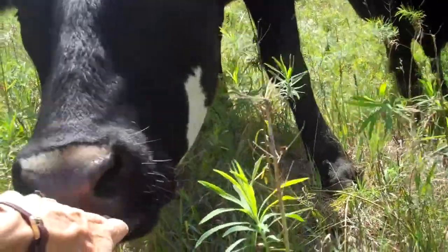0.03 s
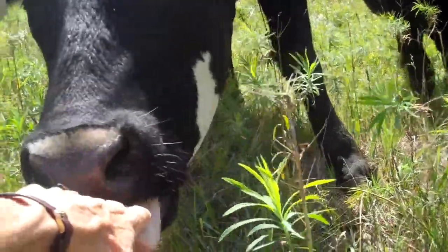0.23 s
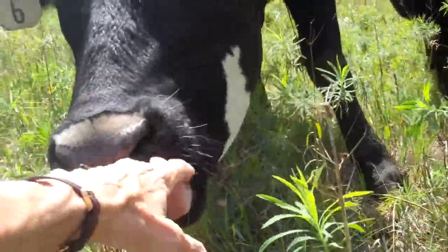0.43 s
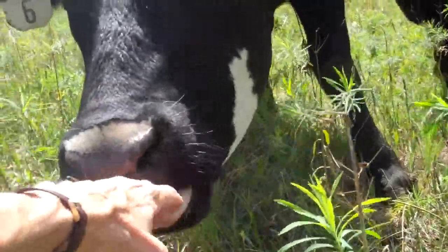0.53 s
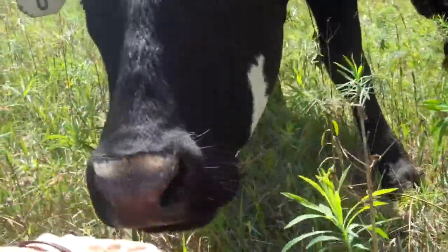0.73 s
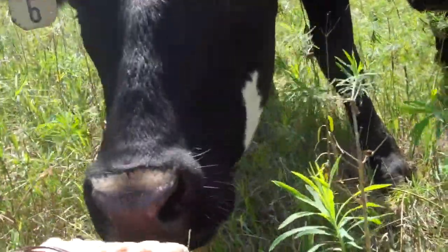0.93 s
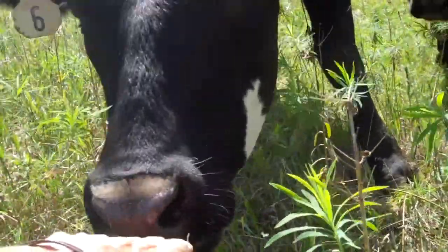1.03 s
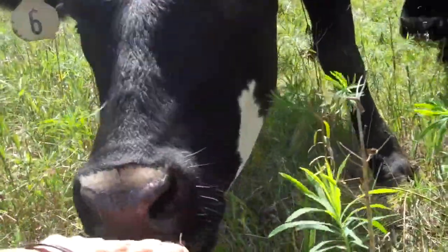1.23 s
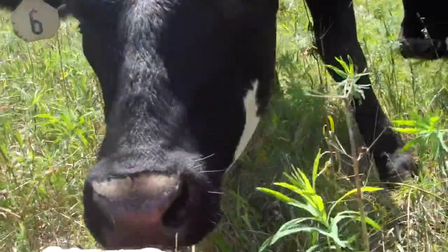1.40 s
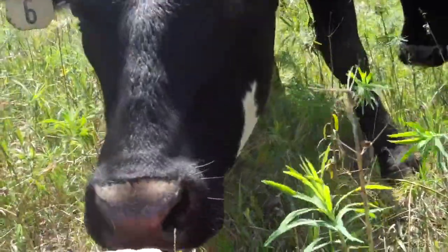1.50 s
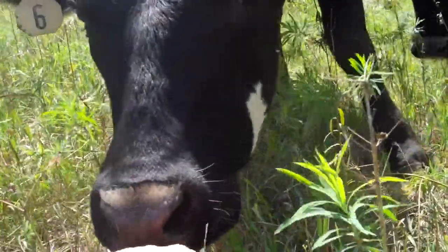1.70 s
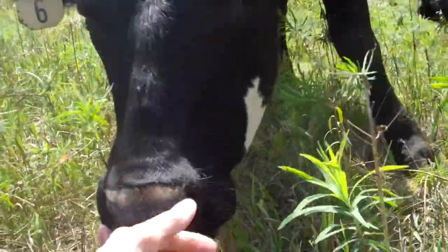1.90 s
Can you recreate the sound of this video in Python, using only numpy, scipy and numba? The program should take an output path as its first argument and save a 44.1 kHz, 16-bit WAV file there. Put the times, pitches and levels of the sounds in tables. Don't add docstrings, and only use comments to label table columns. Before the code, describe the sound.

One rising cow moo over grassy insect hiss, with close sniffs and a final wet lip smack

```python
import sys
import numpy as np
from scipy import signal
from scipy.io import wavfile
from scipy.ndimage import uniform_filter1d
from numba import njit

SR = 44100
rng = np.random.default_rng(int(sys.argv[2]) if len(sys.argv) > 2 else 0)


def volts_from_db(level):
    exponent = np.asarray(level, float) / 20
    return 10 ** exponent


def transcribe(signal):
    frames = np.atleast_2d(signal).T
    limited = np.clip(frames, -1, 1)
    pcm = np.round(limited * 32767).astype(np.int16)
    wavfile.write(sys.argv[1], SR, pcm)


N = 85995

# f/Hz, level/dB per Hz
FIELD_SPECTRUM = [(150, -15), (350, -21), (780, -22), (1200, -24.5), (3000, -24), (9500, -26.5),
                  (11000, -48.5), (14000, -72.5)]
FIELD_HISS_DB, FIELD_PAN_DB, ALIKE_UNDER_HZ = -45, -3, 1500
FIELD_SWELL_DB, FIELD_FLICKER_DB = .8, 1.5

# t/s, length/s, level/dB
GUSTS = [
    (.35, 0.04, -45.5),
    (.99, 0.089, -43),
    (1.105, 0.11, -51),
    (1.5, .08, -43.5),
    (1.684, 0.11, -38.5),
    (1.85, 0.17, -52),
]
WIND_HZ, WIND_BASE_DB = 110, -51

# t/s, length/s, level/dB, brightness f/Hz
SNIFFS = [
    (0.113, 0.023, -49, 4500),
    (0.346, 0.16, -42.5, 5600),
    (0.597, 0.08, -43, 7500),
    (0.903, 0.054, -46, 8100),
    (0.974, 0.13, -46.5, 8906),
    (1.603, 0.017, -40.5, 9180),
    (1.708, 0.21, -51.5, 786),
]
SNIFF_LOW_HZ, SNIFF_LOW_DB = 345, 5.5

# f/Hz, level/dB, t60/s
SMACK_MODES = [(2250, 1, 0.01), (2640, 9, 0.0069), (4000, -16.5, 0.027), (5360, -9, .008)]
SMACK_S, SMACK_DB = 1.928, -27.5

# t/s, pitch f/Hz, level/dB
CALL = [(0.0, 104.8, -39), (0.126, 110.7, -35.5), (0.242, 121.4, -26.5), (0.492, 131.2, -20.5),
        (0.67, 137.4, -19), (0.758, 138.6, -19.5), (0.866, 146, -18.5), (0.958, 156.9, -18),
        (1.082, 166.0, -14.5), (1.356, 175.9, -13.5), (1.48, 173.7, -14), (1.53, 163.4, -13.5),
        (1.562, 147.7, -18), (1.598, 127, -18.5), (1.626, 109.8, -38), (1.64, 106.5, -40)]
# t/s, posture/1 (0 parting, 1 ajar, 2 half open, 3 wide, 4 closing)
MOUTH = [
    (.24, 1),
    (.31, 1.05),
    (.43, 1.24),
    (.6, 1.87),
    (.8, 2),
    (1.03, 3),
    (1.3, 3.),
    (1.535, 3),
    (1.585, 3.95),
]
LIPS_PART_S, PART_TAKES_S = .166, 0.0013
# period scatter/1, size scatter/dB, breath level/dB
UNEVENNESS = [(.0012, .6, -22), (.001, .5, -23), (.0007, .4, -24), (.0005, .5, -25), (.005, 2., -13)]
PULSE_TOP_HZ, PULSE_TURN, TREBLE_LAG_MS_PER_KHZ = 8200, .7, .8
# f/Hz, width/Hz, level/dB
NOSE = [(130, 120, -2), (366.6, 65, 13), (615, 164, 1.5), (1230, 99, 3), (2150, 120, -19), (2586, 81, 3.5),
        (2900, 290, -6), (4320, 130, -8), (5400, 230, -36)]
# f/Hz parting, f/Hz half open, f/Hz wide, f/Hz closing, width/Hz
THROAT = [(200, 278, 270, 270, 278), (383, 394.6, 384.5, 385, 112), (680, 720, 595, 730, 310),
          (1140, 970, 957, 961, 193), (1470, 1450, 1409, 1360, 165), (1760, 1770, 1657, 1500, 265),
          (1914, 1929, 1930, 1980, 136), (2215, 2167, 2200, 2400, 204), (2620, 2655, 2450, 2100, 170),
          (3146, 3173, 2950, 3050, 181), (3710, 3715, 3378, 4100, 277), (4250, 4230, 3790, 4200, 227),
          (4670, 4670, 4470, 3900, 290), (5080, 5120, 5050, 5100, 230), (6100, 6100, 6100, 6600, 370),
          (6900, 6900, 6900, 6900, 360)]
# level/dB parting, ajar, half open, wide, closing
THROAT_STRENGTH = [(-15, -15.5, -11.5, -22.5, -11), (3.5, 3.5, 6, 1, 5), (-13.5, -21.5, -38, -18.5, -27),
                   (-17.5, -13, -16, -10, -13), (1, -4.5, -12, -7, -15), (-22.5, -30.5, -15.5, -7.5, -28.5),
                   (1.5, -0.5, -3, 2, 0), (-15, -16, -16, -12.5, -17), (-11, -6, -26.5, -19.5, -15),
                   (-19, -10, -24.5, -14.5, -23), (-23.5, -16, -16, -20.5, -32),
                   (-7.5, -23, -35, -17, -25.5), (-40, -29.5, -31, -30.5, -39),
                   (-38, -28.5, -38, -36.5, -42.5), (-32, -41, -42, -39.5, -48),
                   (-38, -39, -57.5, -36.5, -45)]
WANDER_DB, WANDER_RATE = 2., 8
# f/Hz, left minus right level/dB
LEAN = [(300, -3), (900, -2.5), (1900, -0.9), (3000, -6.5), (4500, -5)]

# delay/ms, level/dB
GROUND = [(.9, -17), (1.2, -15)]
FIELD_T60_S, SCATTER_DB = .3, -30
MIC_LOW_HZ, MIC_TOP_HZ = 39.3, 10350


def level(x, db):
    return x * volts_from_db(db) / np.sqrt(np.mean(x ** 2))


@njit
def svf(x, hz, width):
    y, b, l = np.empty(len(x)), 0., 0.
    for i in range(len(x)):
        g, k = np.tan(np.pi * hz[i] / SR), width / hz[i]
        v = (b + g * (x[i] - l)) / (1 + g * (g + k))
        b, l, y[i] = 2 * v - b, l + 2 * g * v, k * v
    return y


def band(x, hz, width):
    return svf(x, hz + np.zeros(N), float(width))


def walk(rate):
    hold = int(SR / rate)
    levels = rng.standard_normal(900)
    held = np.repeat(levels[:N // hold + 1], hold)
    return 1.3 * uniform_filter1d(uniform_filter1d(held, hold), hold)[:N]


def swell(t, at, length):
    return np.cos(np.pi * np.clip((t - at) / length, -.5, .5))


def pan(db):
    return volts_from_db(np.array([[db / 2], [-db / 2]]))


def field():
    hz_points, db_points = np.array(FIELD_SPECTRUM).T
    out, slow = 0, walk(4.5)
    for hz in 150 * 2 ** np.arange(0, 6.6, .5):
        mid, side = (band(rng.standard_normal(N), hz, hz / 2.6) for _ in range(2))
        db = np.interp(np.log(hz), np.log(hz_points), db_points)
        db = db + FIELD_SWELL_DB * slow + FIELD_FLICKER_DB * walk(6.07)
        unlike = min(hz / ALIKE_UNDER_HZ, 1)
        out = out + volts_from_db(db) * (mid + unlike * side * np.array([[1], [-1]]))
    return level(out, FIELD_HISS_DB) * pan(FIELD_PAN_DB)


def wind(t):
    force = volts_from_db(WIND_BASE_DB) + sum(volts_from_db(db) * swell(t, at, length) for at, length, db in GUSTS)
    low = signal.butter(2, WIND_HZ, fs=SR, output="sos")
    ports = []
    for _ in range(2):
        flutter = volts_from_db(2.8 * walk(34.9))
        ports.append(flutter * level(signal.sosfilt(low, rng.standard_normal(N)), 0))
    return force * pan(-1.8) * np.array(ports)


def sniffs(t):
    out = 0
    for at, length, db, hz in SNIFFS:
        shared, *own = rng.standard_normal((3, N))
        hiss = np.array([band(shared + 2.4 * air, hz, 0.43 * hz) for air in own])
        low = level(band(shared, SNIFF_LOW_HZ, 660), SNIFF_LOW_DB)
        out = out + volts_from_db(db) * swell(t, at, length) * (level(hiss, 0) * pan(-5.5) + low)
    return out


def smack(t):
    u = np.maximum(t - SMACK_S, 0)
    ring = sum(volts_from_db(db - 60 * u / t60) * np.sin(2 * np.pi * hz * u) for hz, db, t60 in SMACK_MODES)
    onset = np.minimum(u / 0.0023, 1) ** 2
    return volts_from_db(SMACK_DB + 11.5) * ring * onset * pan(-2.0)


def by_mouth(mouth, row):
    return np.interp(mouth, range(len(UNEVENNESS)), row)


def vocal_folds(t, mouth):
    jitter, shimmer_db, breath_db = (by_mouth(mouth, row) for row in np.array(UNEVENNESS).T)
    at, hz, _ = np.array(CALL).T
    pitch = uniform_filter1d(np.interp(t, at, hz), size=1200) * (1 + jitter * walk(70))
    phase = 2 * np.pi * np.cumsum(pitch) / SR
    lag = np.pi * TREBLE_LAG_MS_PER_KHZ * (pitch / 1000) ** 2
    pulses, partial = 0, np.exp(2j * np.pi * PULSE_TURN)
    step, trail = np.exp(1j * (phase - lag)), np.exp(-2j * lag)
    for k in np.arange(1, PULSE_TOP_HZ // 130):
        partial, step = partial * step, step * trail
        pulses = pulses + partial.real * np.clip((PULSE_TOP_HZ - k * pitch) / 1500, 0, 1)
    pulses = level(pulses, 0) * volts_from_db(shimmer_db * walk(60))
    breath = volts_from_db(breath_db) * (1 + np.cos(phase)) * rng.standard_normal(N)
    return pulses + breath


def nose_cavity(folds):
    rings = [(-1) ** k * volts_from_db(db) * band(folds, hz, width) for k, (hz, width, db) in enumerate(NOSE)]
    return sum(rings) * pan(-2.4)


def throat_cavity(folds, mouth):
    out = 0
    for k, (resonance, strength) in enumerate(zip(THROAT, THROAT_STRENGTH)):
        parting, half, wide, closing, width = resonance
        centre = by_mouth(mouth, [parting, (parting + half) / 2, half, wide, closing])
        wander = WANDER_DB * min(half / 3000, 1) * walk(WANDER_RATE)
        ring = band(band(folds, centre, width), centre, width)
        ring = ring * volts_from_db(by_mouth(mouth, strength) + wander)
        out = out + (-1) ** k * ring * pan(np.interp(half, *np.array(LEAN).T))
    return out


def cow(t):
    mouth = np.interp(t, *np.array(MOUTH).T)
    folds = vocal_folds(t, mouth)
    parted = np.clip((t - LIPS_PART_S) / PART_TAKES_S, 0, 1)
    nose = level(nose_cavity(folds), -3) * (1 - parted)
    throat = level(throat_cavity(folds, mouth), 1.4) * parted
    at, _, db = np.array(CALL).T
    loudness = volts_from_db(np.interp(t, [*at, at[-1] + 0.02], [*db, -90]))
    return (nose + throat) * loudness


def scene():
    t = np.arange(N) / SR
    background = field() + wind(t)
    near_cow = sniffs(t) + smack(t)
    moo = cow(t)
    ground = np.array([volts_from_db(db) * np.interp(t - ms / 1000, t, ch) for ch, (ms, db) in zip(moo, GROUND)])
    tail = rng.standard_normal((2, N // 4)) * volts_from_db(-60 * t[:N // 4] / FIELD_T60_S)
    tail = tail / np.sqrt(np.sum(tail[0] ** 2))
    scatter = signal.fftconvolve(moo, tail, axes=1)[:, :N]
    return background + near_cow + moo + ground + volts_from_db(SCATTER_DB) * scatter


def band_limit(x):
    return signal.sosfilt(signal.butter(12, 14710, fs=SR, output="sos"), x)


def record(dry):
    bass_cut = signal.butter(1, MIC_LOW_HZ, "high", fs=SR, output="sos")
    top_cut = signal.butter(4, MIC_TOP_HZ, fs=SR, output="sos")
    mix = signal.sosfilt(np.vstack([bass_cut, top_cut]), dry)
    return band_limit(mix)


dry = scene()
out = record(dry)
transcribe(out)
```